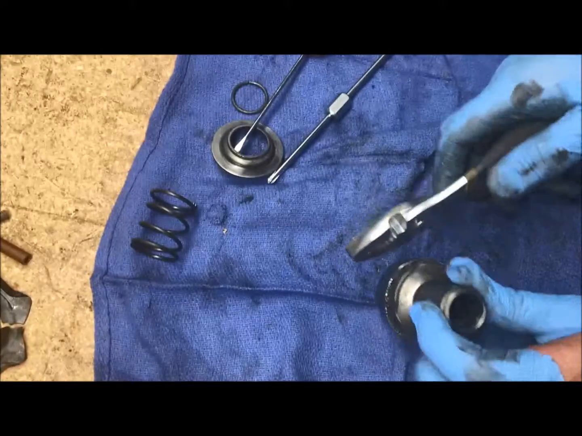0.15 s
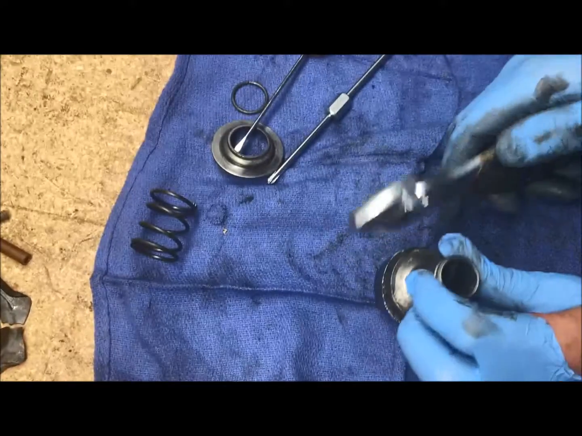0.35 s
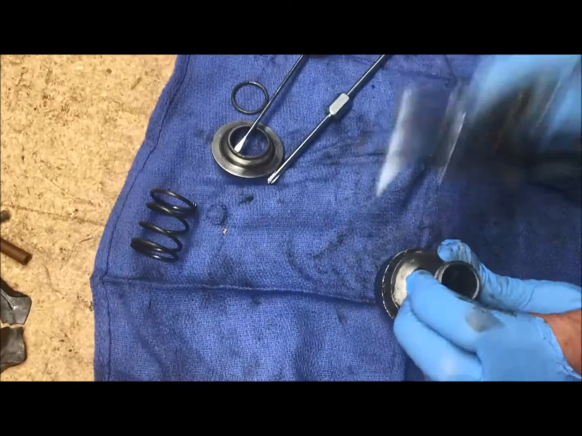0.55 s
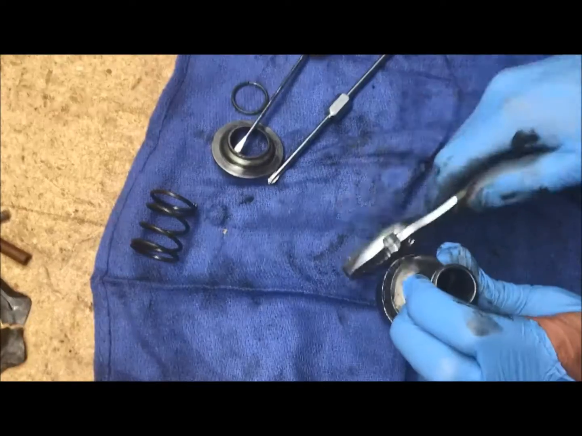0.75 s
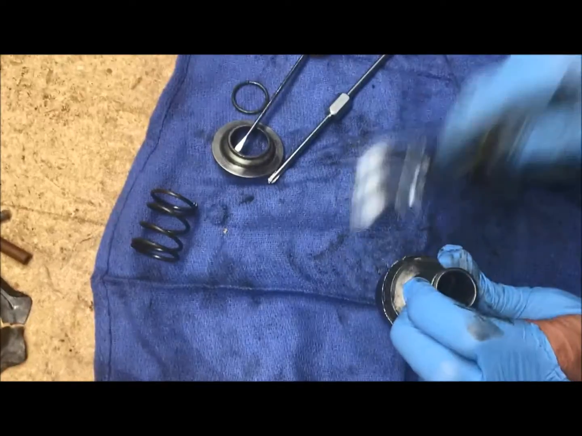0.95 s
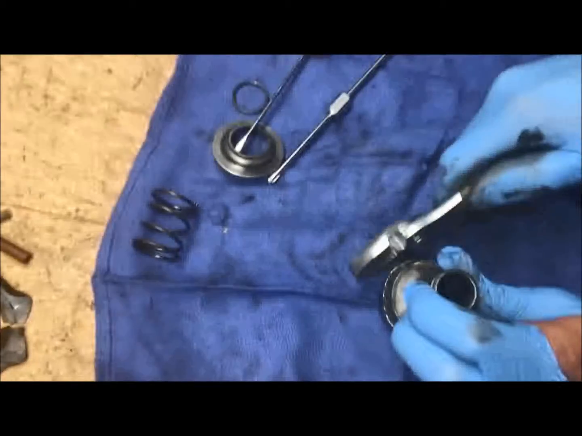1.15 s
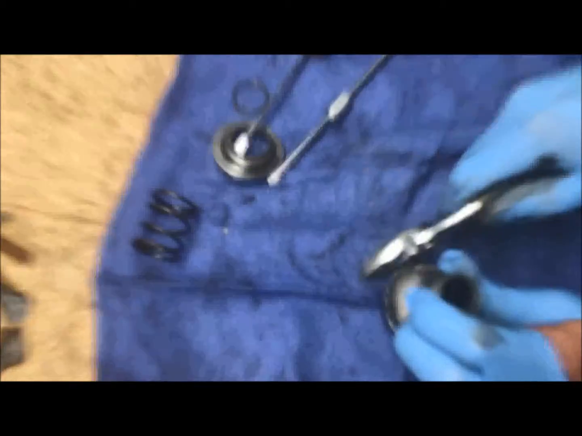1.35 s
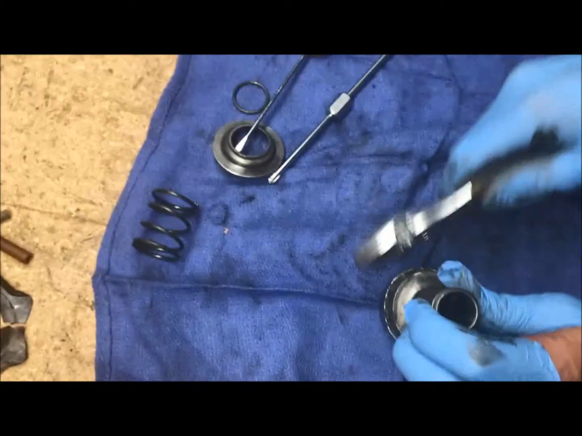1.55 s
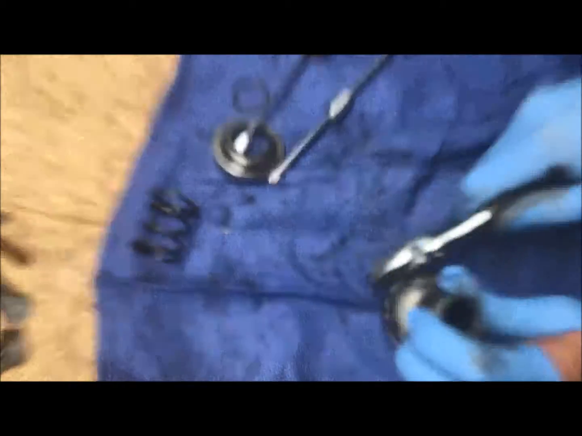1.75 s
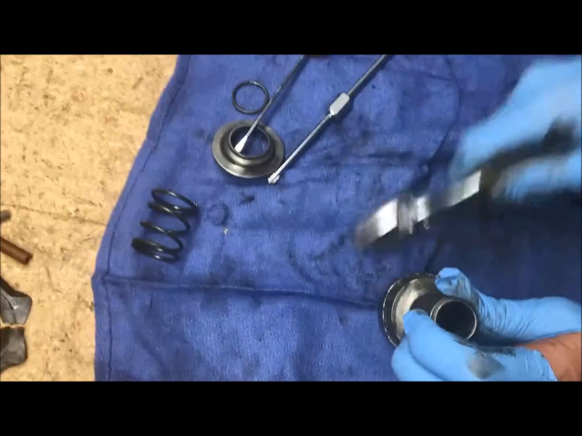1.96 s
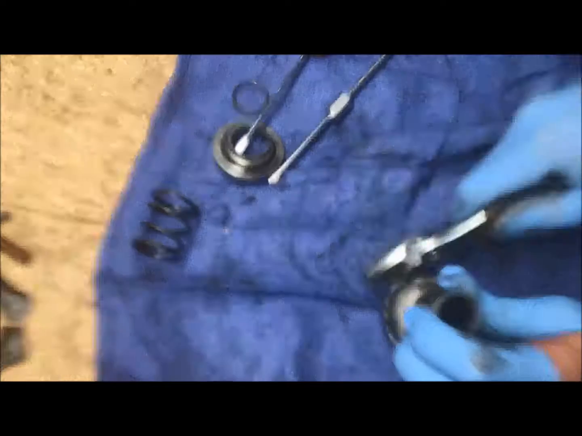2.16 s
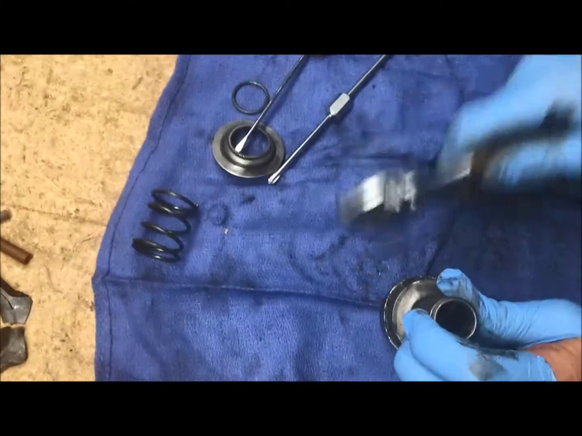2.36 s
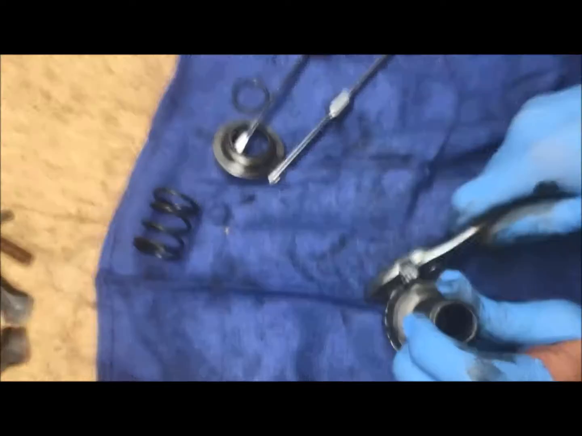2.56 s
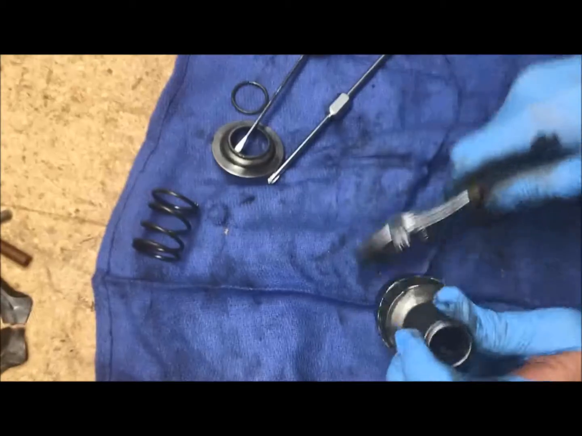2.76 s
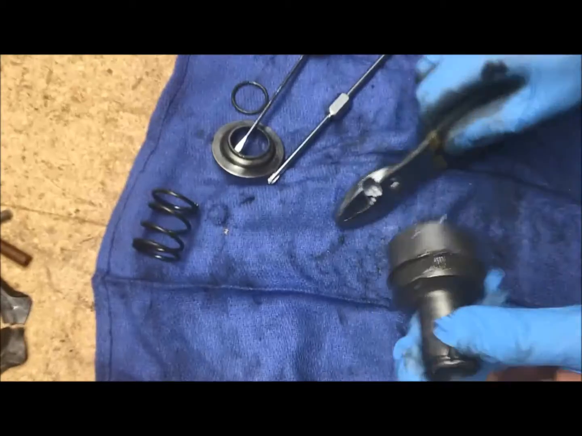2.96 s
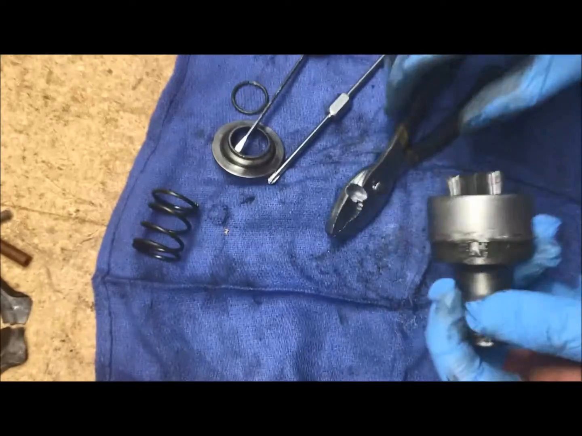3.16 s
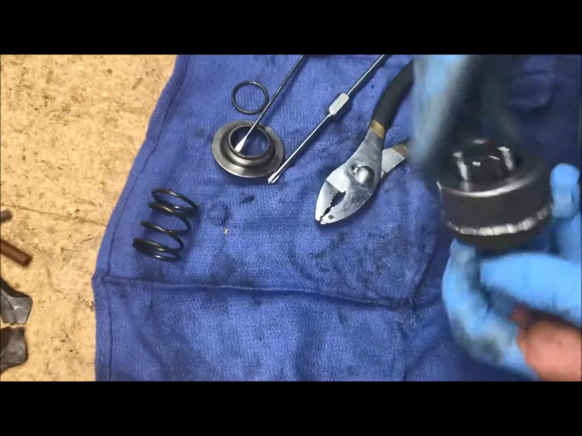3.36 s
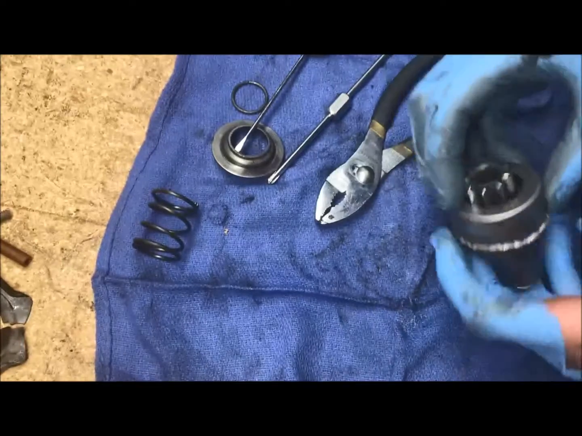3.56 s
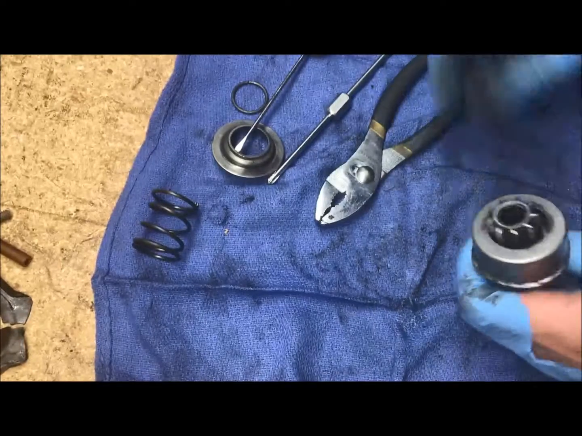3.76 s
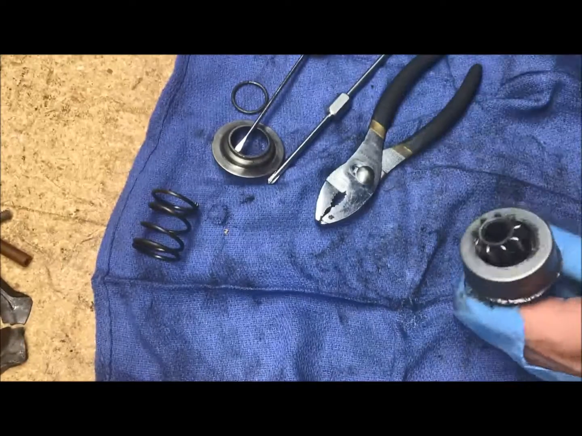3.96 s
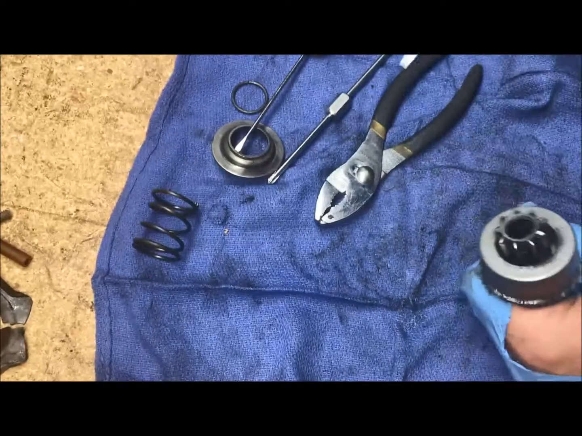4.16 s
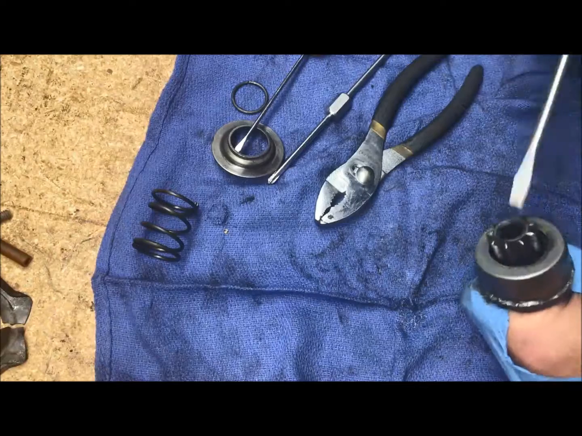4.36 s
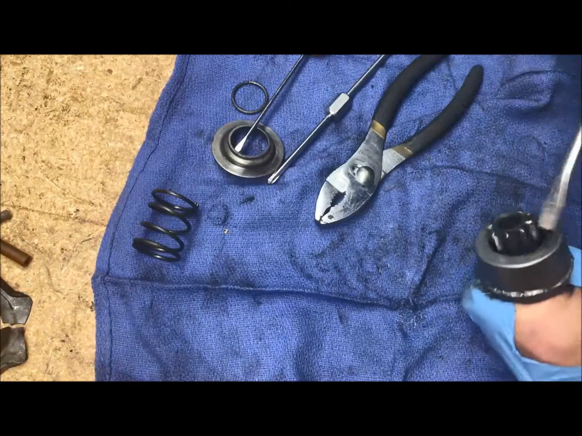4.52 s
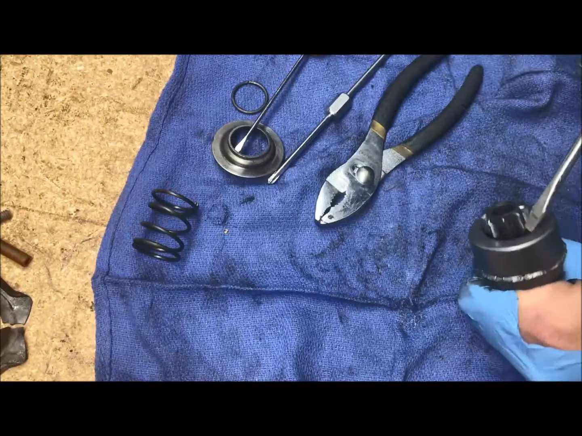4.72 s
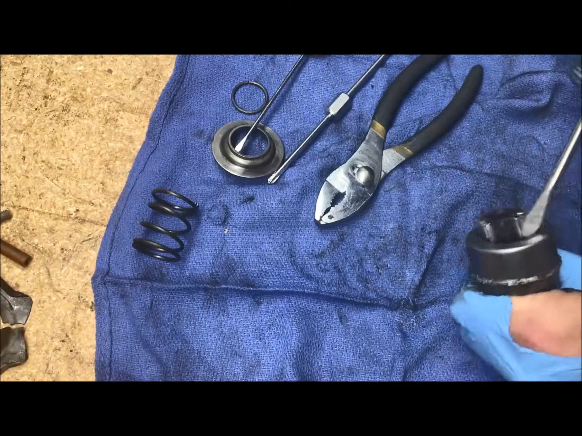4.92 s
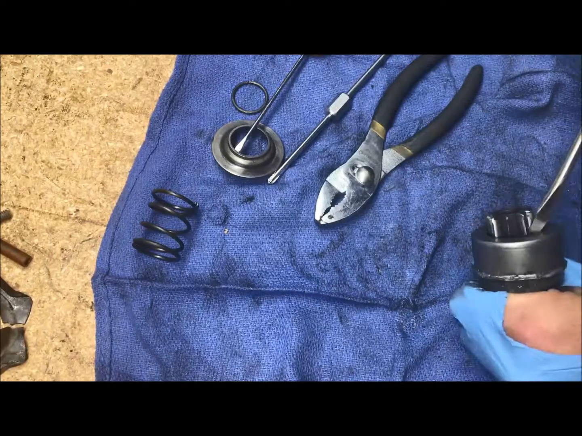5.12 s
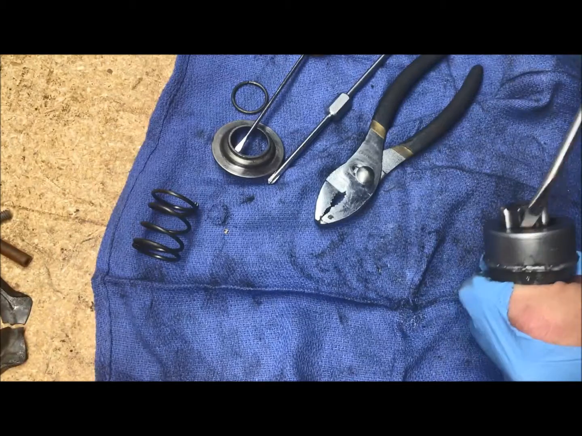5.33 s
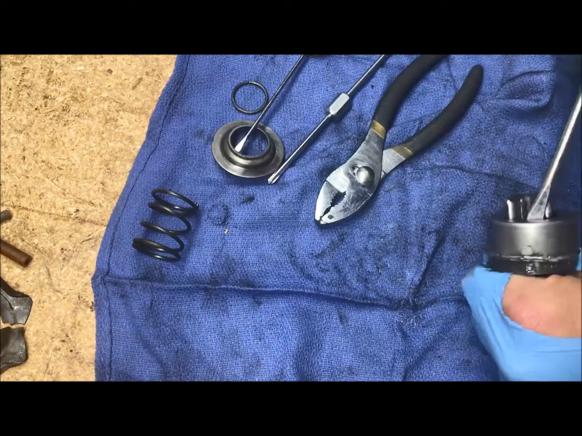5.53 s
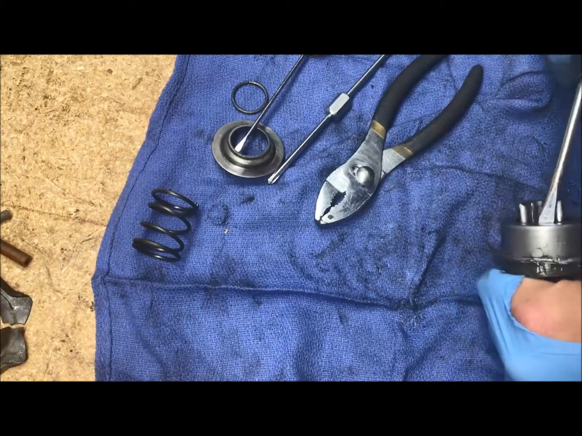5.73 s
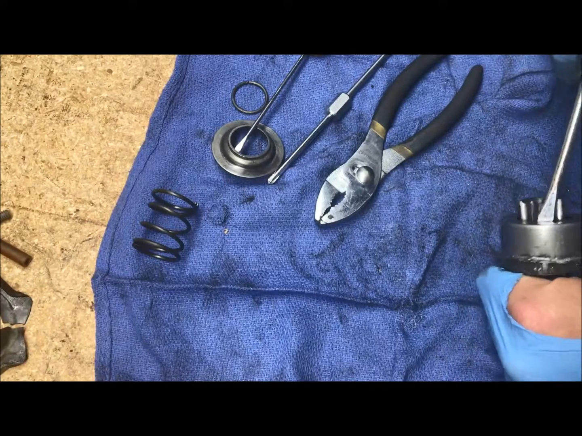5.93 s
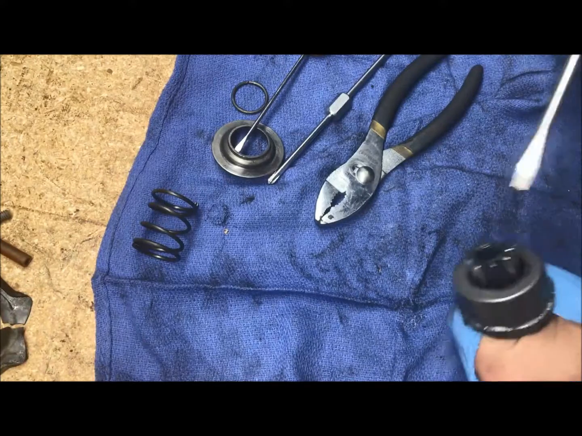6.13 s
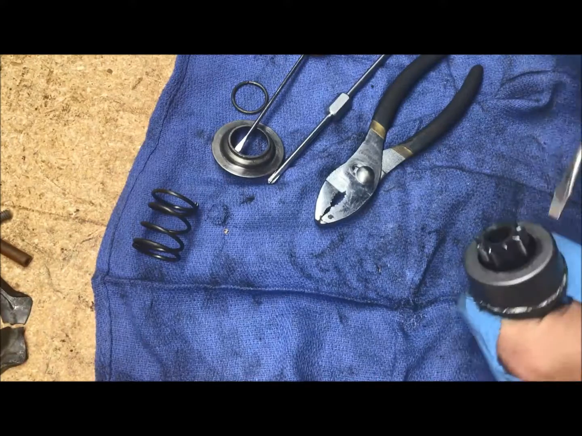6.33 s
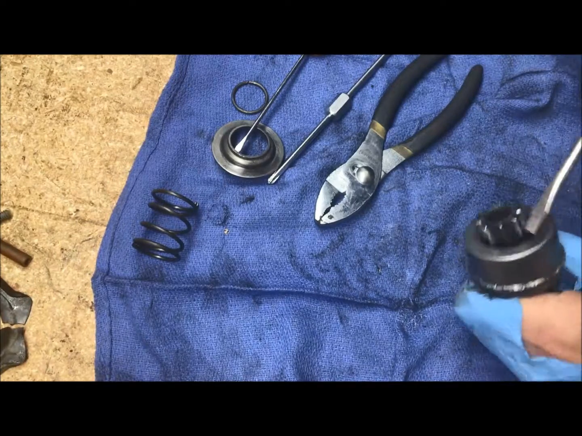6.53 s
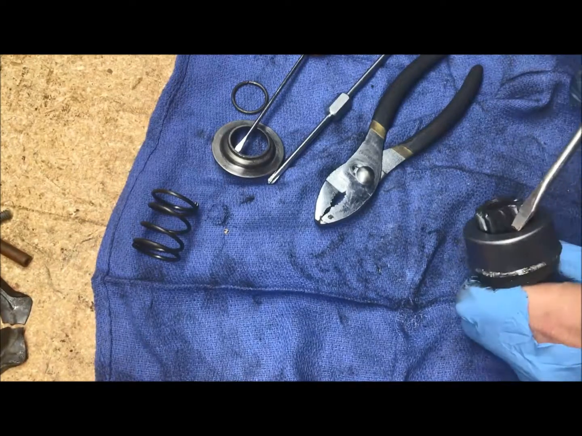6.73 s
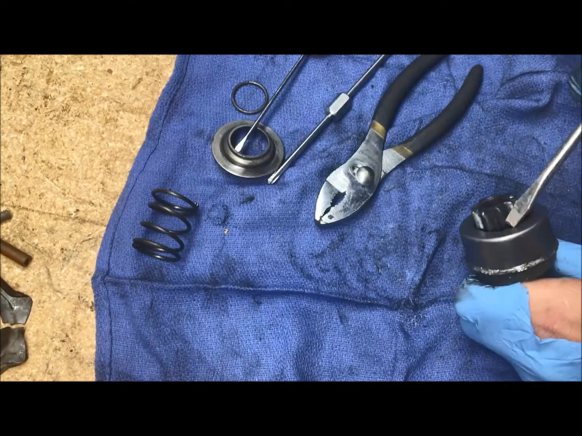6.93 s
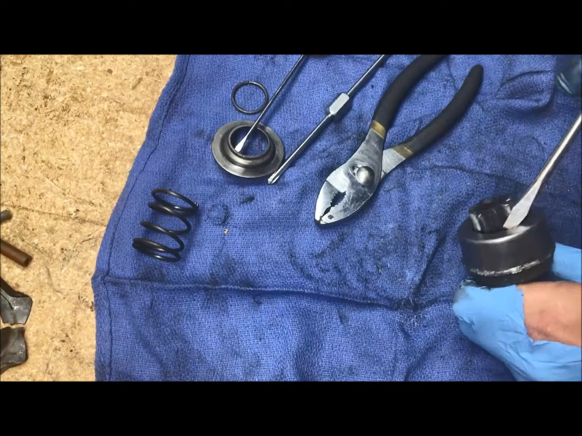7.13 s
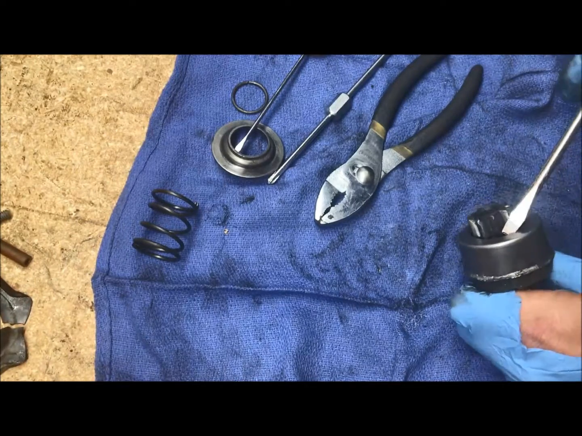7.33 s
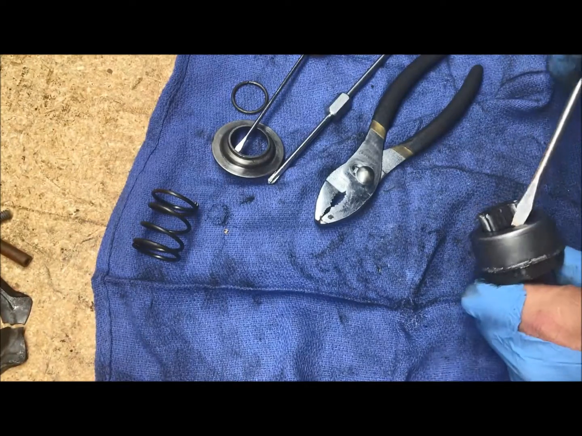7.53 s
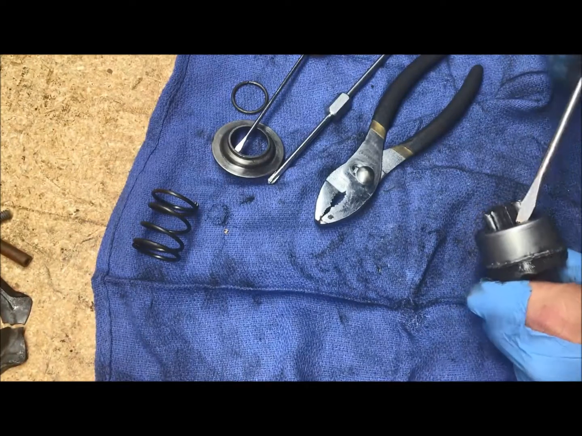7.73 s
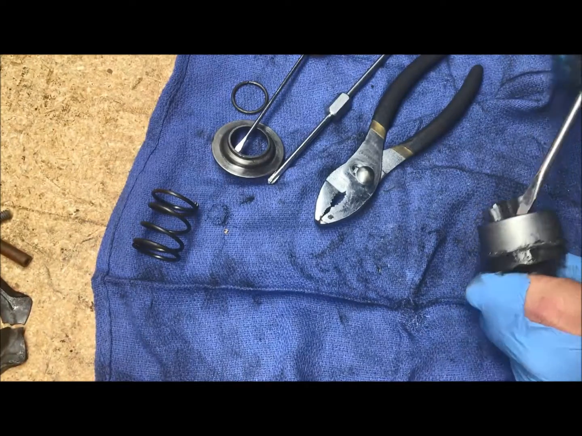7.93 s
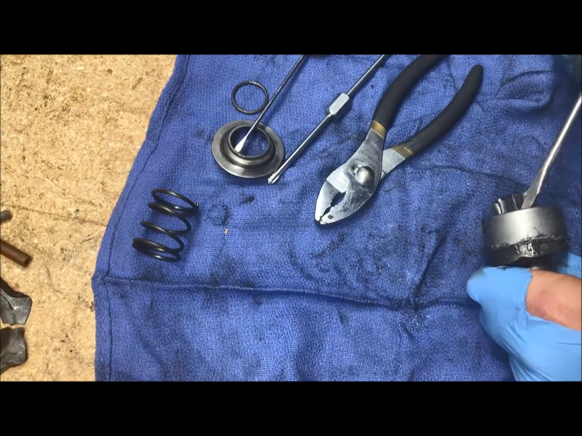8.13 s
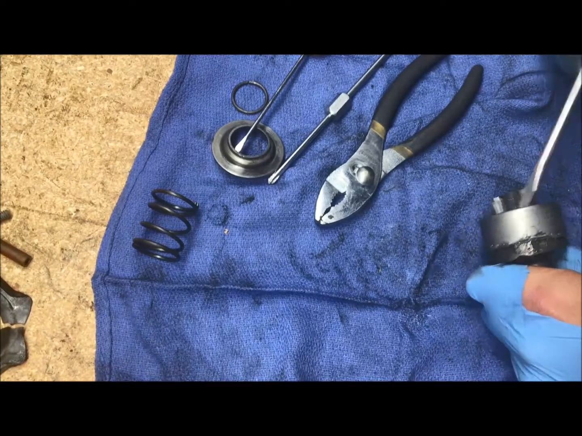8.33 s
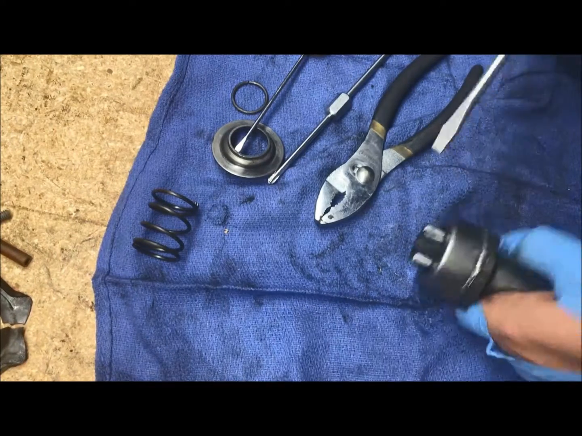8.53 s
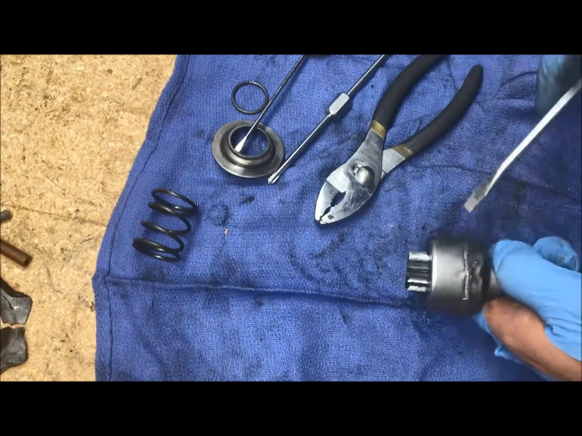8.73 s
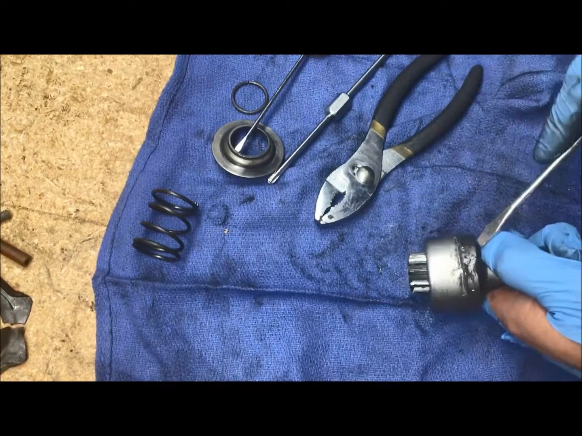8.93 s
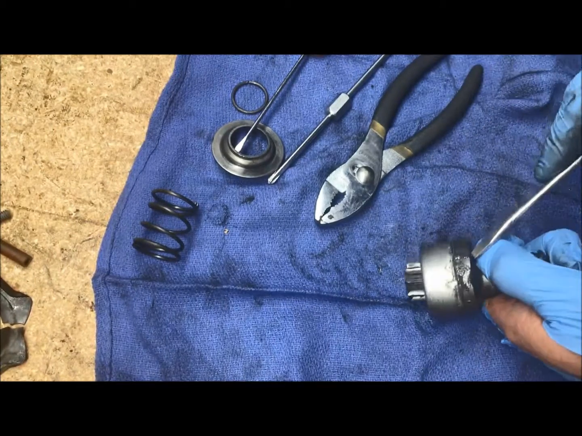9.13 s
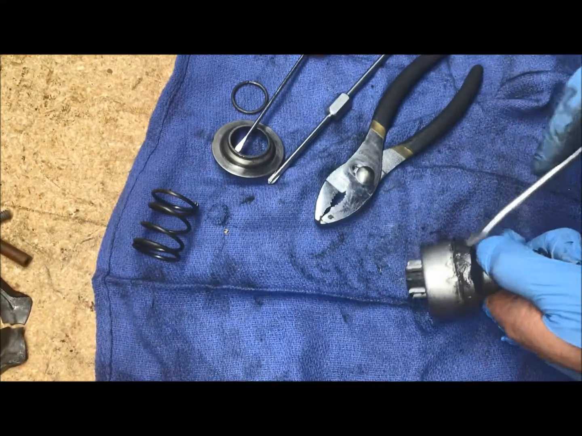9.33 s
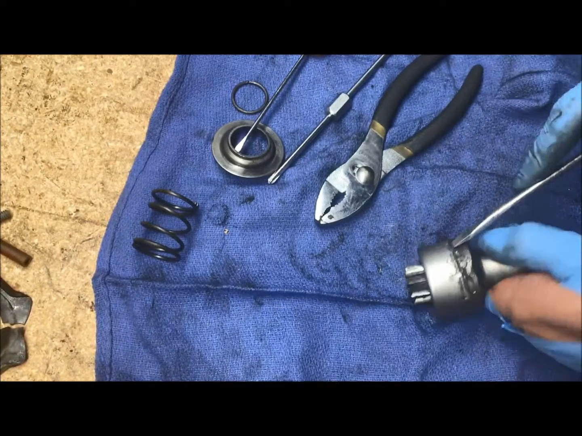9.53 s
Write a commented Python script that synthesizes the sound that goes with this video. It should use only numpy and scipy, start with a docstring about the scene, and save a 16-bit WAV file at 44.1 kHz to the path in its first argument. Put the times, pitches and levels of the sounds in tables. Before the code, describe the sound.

A faint, slightly wavering low machine hum and dull air noise fill a small workshop, heard from a microphone close above the bench. Gloves rustle and steel is lightly touched at the start. From about 0.7 s to 2.6 s pliers hammer a small steel shell six times, roughly every 0.4 s: loud, sharp, crunchy cracks with short bright ringing, a woody knock and low bench boom, and a brief room tail; a couple have a small rebound. A much weaker knock comes near 3.0 s and another at 3.3 s as the pliers are laid down. After quiet rustling, a screwdriver picks at the shell, with a bright cluster of clicks around 4.7 s, then irregular ticks and thin gritty scrapes, busier near 6.1 and 6.7 s. It thins out after 7.1 s; hollow taps and clicks return around 7.8, 8.4 and 9.3-9.6 s.

```python
"""A machine hum of wavering sines and coloured air noise fill a small workshop; gloves rustle in gritty noise.
After a few light touches, pliers hammer a small steel shell held on a cloth-covered wooden bench: noise cracks,
decaying modes for the ringing shell and booming bench, and a diffuse noise return from the room.
The pliers are laid down, then a screwdriver picks and scrapes at the shell: short clicks that ring shell and
blade, strokes of stick-slip grains, and a few hollow taps as the shell shifts in the hand."""
import sys
import numpy as np
from scipy import signal
from scipy.fft import rfft, irfft
from scipy.io import wavfile
from scipy.ndimage import uniform_filter1d, minimum_filter1d

SR = 44100
rng = np.random.default_rng(int(sys.argv[2]) if len(sys.argv) > 2 else 0)


def waveform_to_disk(signal):
    """Save audio, clipped to [-1, 1], as 16-bit WAV at the path in sys.argv[1]."""
    frames = np.transpose(np.atleast_2d(signal))
    scaled = np.clip(frames, -1, 1) * 32767
    samples = np.round(scaled).astype(np.int16)
    wavfile.write(sys.argv[1], SR, samples)


N = 426888
GRAIN = 8192  # length of one burst in samples


def undb(db):
    """Gain of a level in dB."""
    return 10 ** (np.asarray(db) / 20)


def white(size=GRAIN):
    """White noise, rms 1."""
    return rng.standard_normal(size)


def colour(x, points):
    """Shape x by a (f/Hz, level/dB) spectrum, keeping rms 1 for white x."""
    hz, db = np.transpose(points)
    f = np.arange(len(x) // 2 + 1) * SR / len(x) + 1
    gain = undb(np.interp(np.log(f), np.log(hz), db))
    return irfft(rfft(x) * gain, len(x)) / np.sqrt(np.mean(gain ** 2))


def band(x, hz, octaves):
    """Band-pass around hz."""
    edges = np.clip(hz * 2. ** np.array([-octaves / 2, octaves / 2]), 20, .45 * SR)
    return signal.sosfilt(signal.butter(2, edges, "bandpass", fs=SR, output="sos"), x)


def ring(force, hz, t60):
    """One decaying mode; a unit impulse gives a sine that starts at unit size."""
    pole = np.exp(2j * np.pi * hz / SR - np.log(1000) / (max(t60, .005) * SR))
    return signal.lfilter([1], [1, -pole], force).imag


def decay(t60, size=GRAIN):
    """Envelope that falls 60 dB in t60."""
    return np.exp(-np.log(1000) * np.arange(size) / (max(t60, .002) * SR))


def add(track, s, burst):
    """Mix a burst in at s."""
    i = int(s * SR)
    track[i:i + len(burst)] += burst[:N - i]


def walk(rate):
    """Slow smooth random curve with a standard deviation of 1."""
    k = int(SR / rate)
    steps = np.repeat(white(N // k + 1), k)
    curve = uniform_filter1d(uniform_filter1d(steps, k), k)[:N]
    return curve / curve.std()


def crumble(depth_db, size):
    """Random gain that breaks a burst into uneven grains, smoothed over size samples."""
    return undb(depth_db * uniform_filter1d(white(), size=size))


def chatter(t60, share):
    """Force of one contact: a first impulse, then dying rattle."""
    force = share * white() * decay(t60)
    force[0] = 1
    return force


def shares(modes, hz, fall_db_per_octave):
    """Impulse sizes: modes away from the favoured pitch hz get less, down to a floor."""
    floor_db = -24
    octaves = np.abs(np.log2(np.array(modes)[:, :1] / hz))
    return undb(np.maximum(-fall_db_per_octave * octaves, floor_db))


# machine hum partials: (f/Hz, level/dB rms, pitch waver/Hz); a wider waver also sways the level more
HUM_PARTIALS = [(120.3, -50.5, 1), (169, -62, 8), (234, -60.5, 5.5), (590, -79, 5.3)]
# spectrum of the workshop air: (f/Hz, relative level/dB per Hz)
AIR_SPECTRUM = [(15, -36), (36, -17), (52, 0.5), (85, -1), (110, -6), (145, -10), (240, -11), (310, -20),
                (370, -24), (620, -26.5), (800, -29.5), (1500, -29.5), (2870, -43.5), (9150, -45.5),
                (13300, -55)]
AIR_DB = -52


def workshop():
    """Machine hum, sines unsteady in pitch and level, over air noise that swells a little."""
    hum = 0
    for hz, db, waver_hz in HUM_PARTIALS:
        level = np.sqrt(2) * undb(db + 0.43 * waver_hz * walk(6.3))
        phase = 2 * np.pi * np.cumsum(hz + waver_hz * walk(12)) / SR
        hum = hum + level * np.sin(phase)
    air = colour(white(N), AIR_SPECTRUM)
    return hum + undb(AIR_DB + 0.39 * walk(0.92)) * air


# how busy the gloves are on cloth and shell: (t/s, level/dB)
GLOVE_RUSTLE = [(0.0, -66.5), (0.13, -62), (0.3, -74.5), (0.55, -68.5), (3.05, -65), (3.55, -65.5),
                (3.93, -68), (4.129, -65.5), (4.42, -73), (4.84, -68.5), (5.25, -78), (6.12, -69),
                (6.73, -87), (7.091, -72.5), (8.0, -96.5), (8.52, -67), (8.7, -79), (9.68, -76)]
# the tip slides on steel: (t/s, length/s, relative level/dB, centre f/Hz)
TIP_SCRAPES = [(0.021, 0.072, -60, 2280), (0.14, 0.046, -58.5, 4360), (3.164, 0.015, -57.5, 3000),
               (3.214, 0.032, -56, 6900), (4.136, 0.075, -59, 5500), (4.71, 0.051, -47, 7500),
               (4.798, 0.031, -60, 7800), (4.971, 0.087, -53, 8320), (5.167, 0.064, -48, 8100),
               (5.366, 0.031, -55, 6500), (5.429, 0.031, -48.5, 3800), (5.703, 0.065, -65, 5970),
               (6.023, 0.097, -46.5, 7830), (6.215, 0.073, -60.5, 3800), (6.386, 0.088, -67, 7140),
               (6.648, 0.043, -61, 4960), (7.027, 0.072, -62, 5500), (7.808, 0.027, -67.5, 2500),
               (8.369, 0.09, -53.5, 3500), (8.529, .13, -62, 5530), (9.343, 0.021, -53.5, 3950),
               (9.385, 0.033, -59, 3300), (9.617, .04, -64.5, 1620)]
# spectrum of the slipping contact: (f/Hz, relative level/dB per Hz)
SLIP_SPECTRUM = [(1000, -23), (2000, -4.5), (3500, -5.5), (7000, -3.5), (10000, -8.5), (13500, -17.5)]


def rub():
    """Stick-slip grains of uneven size under each scrape, over a faint patchy rustle."""
    patches = undb(2.2 * walk(31) + 1.5 * walk(8.4))
    rustle = colour(white(N), SLIP_SPECTRUM) * patches
    out = undb(np.interp(np.arange(N) / SR, *np.transpose(GLOVE_RUSTLE))) * rustle
    for s, length, db, hz in TIP_SCRAPES:
        grains = white() * crumble(29, 64)
        grains = 0.85 * colour(grains, SLIP_SPECTRUM) + band(grains, hz, 0.63) * 1.8
        stroke = signal.windows.tukey(max(int(length * SR), 2), .6)
        add(out, s, undb(db) * grains[:len(stroke)] / grains.std() * stroke)
    return out


# diffuse return: (f/Hz, early relative level/dB, early t60/s, late relative level/dB, late t60/s)
ROOM_BANDS = [(192, -20, 0.69, -23.5, .7), (310, -7.5, 0.15, -27.5, 0.77), (500, -11, 0.14, -14.5, 0.68),
              (846, -6, 0.026, -20, 0.92), (1460, -17, 0.057, -18, 0.47), (2550, -8.5, 0.15, -26.5, 1),
              (3960, -15, 0.12, -28.5, 0.71), (6200, -21, 0.17, -36.5, 0.73),
              (10790, -22.5, 0.061, -34.5, .3)]


def room(dry):
    """Each band stores the energy it is given and returns it as diffuse noise, early and late."""
    out = 0
    late = np.roll(dry, int(0.0037 * SR))  # the first wall is over a metre round trip
    for hz, early_db, early_t60, late_db, late_t60 in ROOM_BANDS:
        power, stored = band(late, hz, 0.45) ** 2, 0
        for db, t60 in (early_db, early_t60), (late_db, late_t60):
            keep = decay(t60, size=2)[1] ** 2  # energy kept from one sample to the next
            stored = stored + undb(db) ** 2 * signal.lfilter([1 - keep], [1, -keep], power)
        noise = band(white(N), hz, 0.77)
        envelope = np.sqrt(uniform_filter1d(stored, size=256))
        out = out + undb(4) * envelope * noise / noise.std()
    return out


# light touches of tip on shell:
# (t/s, click level/dB, dull body level/dB, relative ring level/dB, favoured f/Hz of the touched spot)
TIP_TICKS = [(0.0253, -42, -49, -59, 2400), (0.6048, -37.5, -80, -47, 4930), (2.8888, -66, -70, -55, 3300),
             (3.692, -54.5, -79, -61, 8300), (3.9823, -50, -59, -58, 6100), (4.1617, -36.5, -64, -42, 5400),
             (4.306, -54, -75, -67, 4510), (4.6615, -32, -66, -36, 3630), (4.6663, -35.5, -52, -31, 3300),
             (4.7045, -30, -38, -20, 4350), (4.7416, -48, -52, -42.5, 3400), (4.996, -51, -58, -52, 8500),
             (5.035, -50, -74, -55, 8240), (5.1998, -47, -51, -44.5, 6850), (5.368, -40, -49, -42, 6200),
             (5.3762, -49, -57, -50, 3480), (5.396, -52, -71, -54, 8800), (5.436, -50.5, -47.5, -59, 3300),
             (5.533, -40, -44.5, -37.5, 7150), (5.642, -54, -72, -60, 7400), (5.7702, -54, -66, -59, 3330),
             (6.0463, -46, -74, -48, 7050), (6.0754, -45, -72, -33.5, 6930), (6.078, -42, -70, -39.5, 9170),
             (6.086, -37, -50, -38, 3900), (6.1014, -49, -74, -42, 3520), (6.1888, -53, -69, -55, 3600),
             (6.2073, -51.5, -67, -60, 2520), (6.2537, -56, -81, -53, 3330),
             (6.6403, -45, -42.5, -39, 8000), (6.6713, -33, -55, -37, 3980),
             (6.8686, -54.5, -68, -54, 3560), (6.9219, -60, -51.5, -54, 7900),
             (6.926, -47.5, -62, -55, 3870), (6.978, -53.5, -76, -63, 3900),
             (7.0702, -49, -64, -53.5, 3560), (7.093, -53, -77, -53, 8800), (7.8625, -60, -62, -63, 4280),
             (8.1646, -45, -78, -53, 7450), (8.4185, -46, -41.5, -44, 3380), (8.428, -42, -68, -31.5, 9180),
             (8.528, -55, -77, -60, 5900), (9.3464, -34, -41.5, -47, 3780), (9.4077, -45, -34.5, -38, 3500),
             (9.5725, -55.5, -59, -58, 3300)]
TICK_T60_S, TICK_FALL_DB_PER_OCTAVE = 0.026, 60


def ticks(ring_forces):
    """Each touch is a crumbling noise click with a duller body, and an impulse to shell and blade."""
    out = np.zeros(N)
    for s, db, body_db, ring_db, hz in TIP_TICKS:
        click, body = band(white(), hz, 1.19), band(white(), 1660, 1.66)
        rattle = decay(TICK_T60_S) * crumble(22.5, 48)
        add(out, s, (undb(db) * click / click.std() + undb(body_db) * body / body.std()) * rattle)
        sizes = shares(SHELL_MODES + BLADE_MODES, hz, TICK_FALL_DB_PER_OCTAVE)
        for force, size in zip(ring_forces, sizes):
            add(force, s, undb(ring_db) * size)
    return out


# shell modes are close pairs that beat, the weaker twin lasting longer:
# (f/Hz, relative level/dB, t60/s, twin offset/Hz, twin relative level/dB, twin t60/s)
SHELL_MODES = [(6740, 0.5, 0.13, 20, -25.5, 0.44), (7447, 0, 0.086, 22, -19, 0.24),
               (9033, 3.5, 0.11, 22, -22, 0.31)]
# screwdriver blade modes, same columns; the low pair is spread wide and nearly equal in level
BLADE_MODES = [(3440, 2, 0.043, 455, 3, 0.024), (8300, 7, 0.053, 55, -36, 0.033)]


def steel_rings(ring_forces):
    """Shell and blade ring as pairs of decaying modes driven by the contact impulses."""
    tones = 0
    grip = undb(3.9 * walk(70))  # the gloved fingers damp the twin rings unevenly
    for force, mode in zip(ring_forces, SHELL_MODES + BLADE_MODES):
        hz, db, t60, offset, twin_db, twin_t60 = mode
        tones = tones + undb(db) * ring(force, hz, t60)
        tones = tones + undb(twin_db) * ring(force, hz + offset, twin_t60) * grip
    return tones


# the bench takes a push:
# (t/s, boom relative level/dB, dull knock relative level/dB, bright knock relative level/dB, push length/s)
BENCH_THUDS = [(0.048, -18, -67, -54, 0.0059), (0.663, -1, -16, -17, 0.0017),
               (1.053, 1.5, -17, -17.5, 0.0033), (1.064, -19, -32, -22.5, 0.0073),
               (1.404, -2.5, -20.5, -10.5, 0.001), (1.42, -10.5, -21, -23.5, 0.0029),
               (1.798, -2, -19.5, -15.5, 0.0024), (2.184, -1, -13, -14, 0.0037),
               (2.573, -3, -18, -14.5, 0.002), (2.591, -3.5, -12.5, -15.5, 0.0023),
               (2.966, -8.5, -18.5, -48, 0.0019), (3.154, -14.5, -50, -70, 0.0042),
               (3.286, -16.5, -51, -58, 0.00081), (3.31, -8.5, -19.5, -29.5, 0.0018)]
# booming modes of the board: (f/Hz, relative level/dB, t60/s)
BOOM_MODES = [(35.9, -19, 0.088), (66.5, -17, 0.44), (108.5, -3, .15), (131.4, -7.5, .35),
              (173.5, -5.5, 0.085), (239.2, -0.5, 0.073), (284.5, -5, 0.1), (356, -7, 0.072)]
# woody knock modes: (f/Hz, relative level/dB, t60/s)
KNOCK_MODES = [(405, -2, 0.052), (476, -3, 0.077), (640.8, 1.5, 0.19), (850, 2, .04), (1180, -4, 0.026),
               (1520, -5.5, 0.038), (1721, -7.5, 0.069)]
# trim of the lower and the upper board modes: (lower/dB, upper/dB)
BOARD_TRIM = (-10, -7.5)
BENCH_CHATTER_T60_S = 0.044


def bench():
    """The cloth stretches each push, so the board booms; harder contact adds a woody knock."""
    forces = np.zeros((4, N))  # lower board, upper board, dull knock, bright knock
    blurs = np.zeros((2, N))  # dull, bright
    rattle_t60 = BENCH_CHATTER_T60_S
    for s, db, *knocks_db, push_s in BENCH_THUDS:
        push = np.hanning(max(int(push_s * SR), 1) + 2)  # a longer push leaves the high modes alone
        short_push = push[::3]
        heave = np.convolve(chatter(rattle_t60, .015), push / push.sum())
        soft = np.convolve(chatter(rattle_t60, 0.072), push / push.sum())
        hard = np.convolve(chatter(rattle_t60, .1), short_push / short_push.sum())
        levels_db = [db + BOARD_TRIM[0], db + BOARD_TRIM[1], *knocks_db]
        for force, level_db, shape in zip(forces, levels_db, (heave, soft, hard, hard)):
            add(force, s, undb(level_db) * shape)
        swell = decay(2.84 * rattle_t60) * (1 - decay(.012))
        for blur, level_db in zip(blurs, knocks_db):
            add(blur, s, undb(level_db - 1.5) * swell)
    out = np.zeros(N)
    # neighbouring modes start in opposite directions
    for k, (hz, db, t60) in enumerate(BOOM_MODES):
        out += (-1) ** k * undb(db + 5.5) * ring(forces[int(k > 3)], hz, t60)
    for k, (hz, db, t60) in enumerate(KNOCK_MODES):
        out += (-1) ** k * undb(db - 6.5) * ring(forces[2 + int(k > 2)], hz, t60)
    for blur, hz in zip(blurs, (540, 1150)):  # the dense upper modes blur into noise
        noise = band(white(N), hz, 0.94)
        out += blur * noise / noise.std()
    return out


# steel on steel:
# (t/s, crack relative level/dB, ring relative level/dB, favoured f/Hz of the struck spot, chatter t60/s)
HAMMER_BLOWS = [(0.6641, -4.5, -16.5, 8200, 0.055), (0.704, -32, -52, 8200, .02),
                (1.058, -6.5, -18, 7300, 0.067), (1.072, -23, -34.5, 7300, .03),
                (1.4065, -5.5, -22.5, 6700, 0.082), (1.797, -8.5, -21.5, 9000, 0.083),
                (2.188, -7, -14, 6700, 0.064), (2.574, -10.5, -13, 7100, 0.11),
                (2.591, -19.5, -30.5, 9000, .04), (2.9719, -24, -36, 6500, .03),
                (3.318, -23.5, -38.5, 7200, .061)]
# spectrum of the crack: (f/Hz, relative level/dB per Hz)
CRACK_SPECTRUM = [(880, -41), (1500, -14), (2230, -7), (3410, -0.5), (5020, -0.5), (6930, 5.5), (8180, -4),
                  (12700, -16), (13600, -38)]
BLOW_FALL_DB_PER_OCTAVE = 22  # a hard blow wakes all the shell modes


def blows(ring_forces):
    """Each blow is a noisy crack, and an impulse that sets the shell ringing."""
    out = np.zeros(N)
    for s, db, ring_db, hz, t60 in HAMMER_BLOWS:
        # a sharp front, then the loose parts crunch together
        crunch = decay(0.015) + 0.72 * decay(t60) * crumble(2.7, 64)
        add(out, s, undb(db) * colour(white(), CRACK_SPECTRUM) * crunch)
        # the shell forces come first, so the blade stays still
        for force, size in zip(ring_forces, shares(SHELL_MODES, hz, BLOW_FALL_DB_PER_OCTAVE)):
            add(force, s, undb(ring_db) * size)
    return out


# hollow taps as the shell shifts in the hand: (t/s, relative level/dB, f/Hz)
SHELL_TAPS = [(4.939, -51.5, 385), (7.812, -45.5, 630), (7.862, -59, 337), (8.387, -42, 412),
              (8.404, -44.5, 375), (9.626, -44, 683)]
TAP_T60_S = 0.045


def taps():
    """Short hollow notes: one quickly decaying mode, driven by a rattling contact."""
    out = np.zeros(N)
    for s, db, hz in SHELL_TAPS:
        add(out, s, undb(db) * ring(chatter(0.099, 0.043), hz, TAP_T60_S))
    return out


def scene():
    """All sources at one microphone above the bench."""
    ring_forces = np.zeros((len(SHELL_MODES + BLADE_MODES), N))
    dry = rub() + ticks(ring_forces) + bench() + blows(ring_forces) + taps()
    return (workshop() + dry + room(dry) + steel_rings(ring_forces))[None]


MIC_LOW_HZ, TOP_HZ = 26, 13250
CEILING_DB = -3.2  # limiter ceiling ahead of the top cut


def record(dry):
    """The small microphone drops the deep bass, a fast look-ahead limiter holds the blows, the top is cut."""
    dry = signal.sosfilt(signal.butter(2, MIC_LOW_HZ, "highpass", fs=SR, output="sos"), dry)
    gain = np.minimum(1, undb(CEILING_DB) / (np.abs(dry) + 1e-9))
    gain = uniform_filter1d(minimum_filter1d(gain, size=441), size=221)
    return signal.sosfilt(signal.ellip(10, .2, 70, TOP_HZ, fs=SR, output="sos"), dry * gain)


dry = scene()
out = record(dry)
waveform_to_disk(out)
```